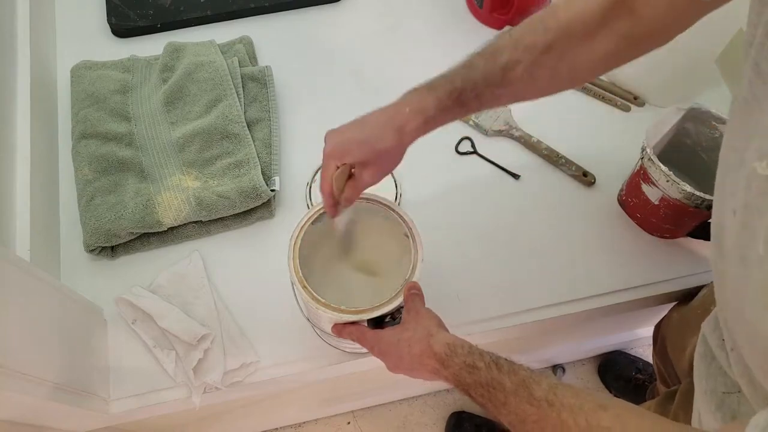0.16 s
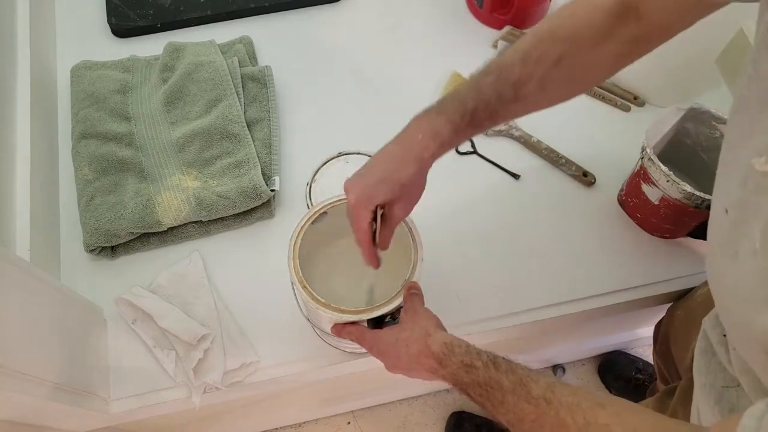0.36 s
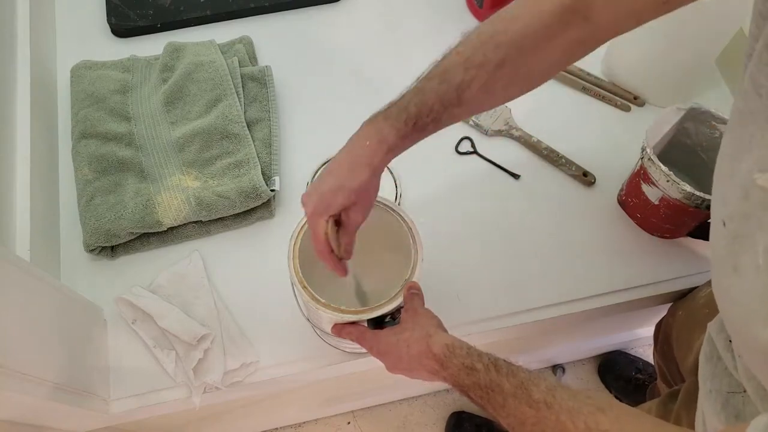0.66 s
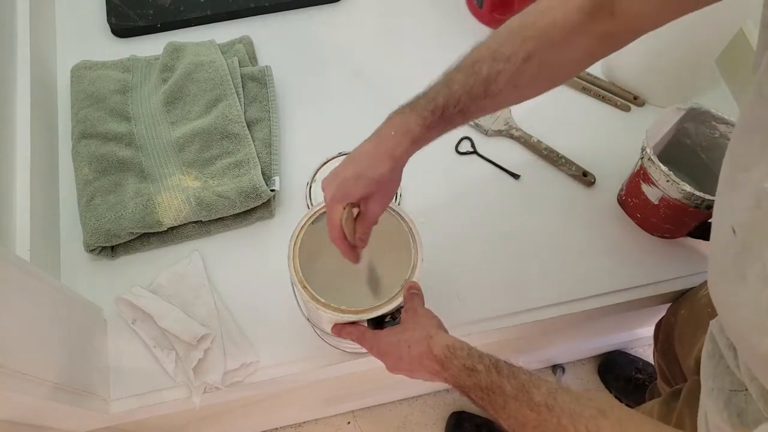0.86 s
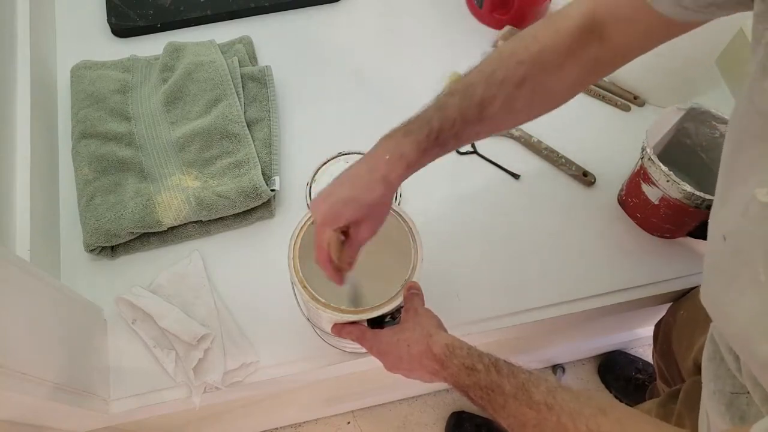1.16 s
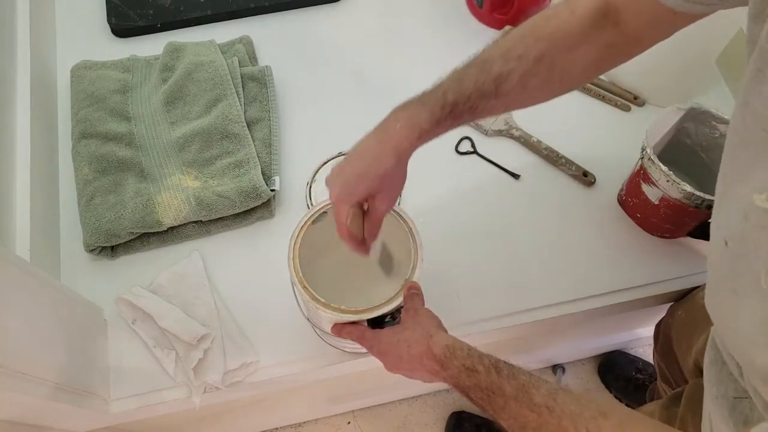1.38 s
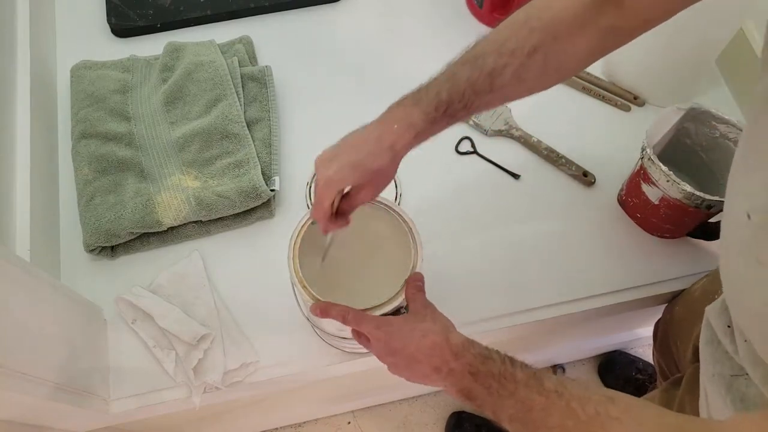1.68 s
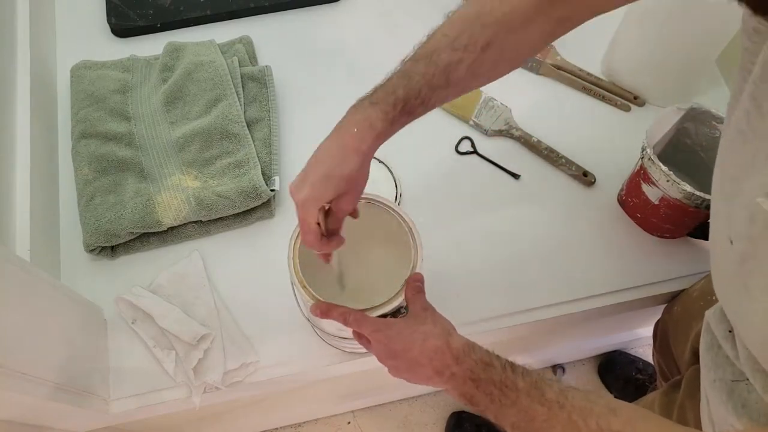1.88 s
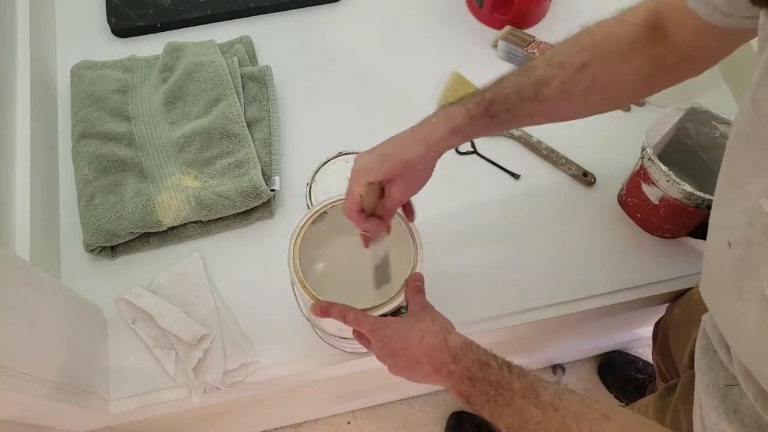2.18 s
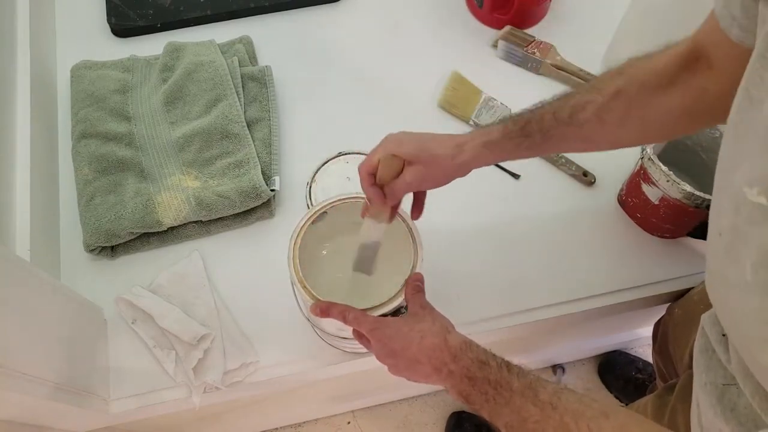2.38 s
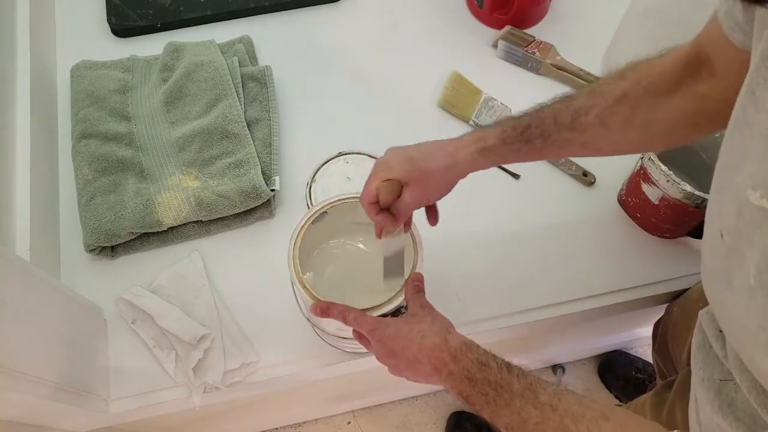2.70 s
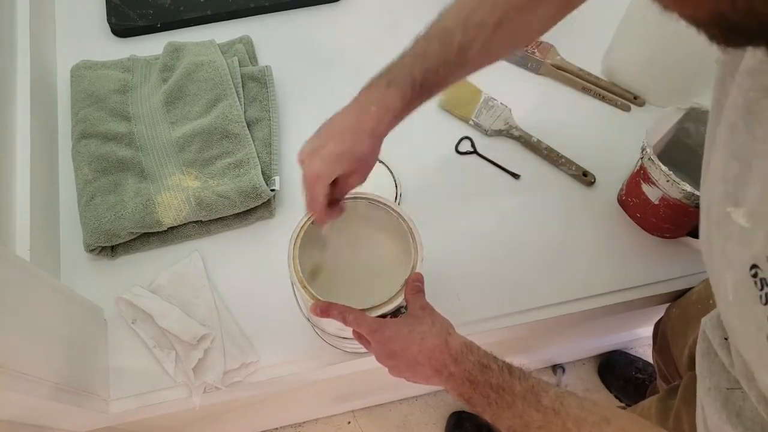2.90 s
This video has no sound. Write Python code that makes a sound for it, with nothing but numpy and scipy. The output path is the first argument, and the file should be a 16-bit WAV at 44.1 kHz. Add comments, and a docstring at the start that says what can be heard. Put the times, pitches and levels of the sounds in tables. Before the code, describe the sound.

Vigorous stirring in a paint-filled can: rough skidding knocks come first, then crisper irregular taps that grow loudest near the end, with short wall rubs and bright rim ticks; close microphone, small dry room, low hum.

```python
"""A dense rattle is heard first: a wooden stick stirs fast in a full metal paint can, knocking and skipping.
Each contact is a short rough push that excites the modes of the paint-damped can: a low body ring,
upper modes and a bright crack of filtered noise, answered by the diffuse tail of a small hard room.
In places the stick rubs along the wall: random slips through the same modes, with hiss.
Steady shaped noise lies under it all as a low room hum."""
import sys
import numpy as np
from scipy import signal
from scipy.fft import rfft, irfft, next_fast_len
from scipy.io import wavfile
from scipy.ndimage import uniform_filter1d

SR = 44100
rng = np.random.default_rng(int(sys.argv[2]) if len(sys.argv) > 2 else 0)


def master_out(mix):
    """Clip the mix to full scale and print it as 16-bit PCM to the path in sys.argv[1]."""
    frames = np.transpose(np.atleast_2d(mix))
    ceiling = np.clip(frames, -1, 1)
    pcm = np.round(ceiling * 32767).astype(np.int16)
    wavfile.write(sys.argv[1], SR, pcm)


def to_linear_factor(level_db):
    """Convert decibel levels (scalar or array-like) to linear amplitude factors."""
    exponent = np.asarray(level_db, float) / 20
    return 10 ** exponent


N = 134505
LENGTH, LEAD = 8192, 1024  # samples computed per contact, and those of them ahead of the contact
T = (np.arange(LENGTH) - LEAD) / SR  # s from the contact
AFTER = np.maximum(T, 0)
HZ = np.fft.rfftfreq(LENGTH, 1 / SR)

TAP_RISE_MS, SKID_PEAK_S, SKID_HZ = 0.05, 0.002, 2150
TICK_RING_DB, TICK_HZ = -1, 3430  # upper modes over the crack, best-driven mode
# sharp taps: t/s, contact level/dB, low ring over it level/dB, crack over it level/dB,
# best-driven upper modes f/Hz
TAP_CONTACTS = [(0.0024, -10, -8, -13, 2500), (0.013, -11.5, -19, -6.5, 2340),
                (0.051, -14.5, -38, -4, 2520), (0.118, -16.5, -36, 2, 2490), (0.353, -21.5, -3, -2, 3480),
                (0.4, -21.5, -40, 1, 3360), (0.4205, -13.5, -7.5, -24, 2520), (0.5072, -8, -8.5, -18, 2380),
                (0.5505, -9, -14.5, -18, 2360), (0.6938, -17, -12, -6.5, 1540), (0.7263, -19, -9, -5, 1650),
                (0.7905, -7, -14.5, -11, 1580), (0.8151, -11, -21, -27, 3480),
                (0.829, -7.5, -15, -21, 3930), (0.8566, -3, -18.5, -16, 2220),
                (0.8881, -14.5, -12, -19, 2350), (0.9143, -9, -12, -37, 1600), (0.9427, -24, -3, -28, 1610),
                (0.966, -8.5, -11, -19, 1700), (0.991, -12, -13, -10.5, 1670),
                (1.0103, -11, -14.5, -10.5, 2540), (1.042, -12, -16.5, -10.5, 1590),
                (1.0639, -17.5, -17.5, -20, 1560), (1.137, -14.5, -14, -10, 1770),
                (1.1631, -16, -11.5, -8.5, 1610), (1.1941, -13.5, -21, -17, 3200),
                (1.2102, -9.5, -15, -14, 1590), (1.2348, -18, -13, -21, 3440),
                (1.2741, -12, -8.5, -8, 1610), (1.304, -11.5, -18, -13, 3430), (1.3252, -13, -31, -9, 1570),
                (1.3532, -11.5, -14, -12.5, 1620), (1.3787, -10.5, -12.5, -11.5, 3100),
                (1.4169, -14.5, -11.5, -13, 2530), (1.4427, -13, -10.5, -5, 3420),
                (1.5113, -8.5, -15.5, -10.5, 1630), (1.5351, -13.5, -23, -7.5, 3420),
                (1.548, -15, -22, -16, 1610), (1.5849, -12.5, -40, -4.5, 3900),
                (1.607, -9.5, -17, -15, 1660), (1.626, -20, -45, -7.5, 2770),
                (1.6496, -8, -18.5, -6.5, 1550), (1.6728, -10, -13, -7.5, 1680),
                (1.69, -9.5, -43, -19, 3400), (1.7131, -16, -35, -6, 1920),
                (1.737, -15.5, -12, -11.5, 1520), (1.7598, -15, -29, -2.5, 2360),
                (1.865, -19.5, -17, -16, 3380), (1.8793, -14.5, -24, -18, 2590),
                (1.9144, -21, -39, -14, 2410), (1.929, -4.5, -16, -15, 2480),
                (2.0056, -20, -7.5, -35, 1620), (2.0209, -18, -38, -9, 2390),
                (2.0646, -12.5, -12.5, -8, 3600), (2.0805, -12, -32, -10.5, 2360),
                (2.1104, -18.5, -32, -10.5, 1700), (2.1438, -23, -32, -3, 1410),
                (2.1956, -16, -9.5, -35, 1340), (2.2084, -9, -49, -3.5, 3130),
                (2.225, -4.5, -11.5, -24, 1630), (2.2414, -6.5, -53, -7.5, 2470),
                (2.2673, -4, -18, -15, 1730), (2.2912, -8.5, -54, -6, 2700),
                (2.3125, -4.5, -12.5, -23, 1730), (2.3303, -4.5, -36, -6.5, 3900),
                (2.369, -8, -50, -5.5, 1770), (2.393, -7.5, -13, -16, 2560), (2.4089, -9, -39, -5, 3170),
                (2.4266, -1, -15, -18, 1700), (2.4667, -10, -44, -9, 2540), (2.487, -5, -16.5, -16, 1540),
                (2.5134, -12.5, -13.5, -18, 2480), (2.5404, -3, -15, -22, 2480),
                (2.594, -6, -10.5, -15.5, 1600), (2.6211, -5, -9.5, -20, 1620),
                (2.6472, -1.5, -19.5, -16.5, 1510), (2.679, -10.5, -39, -7, 2480),
                (2.728, -1, -14.5, -12.5, 1310), (2.7567, 2.5, -17, -16.5, 1860),
                (2.7995, -6.5, -17, -15.5, 3430), (2.8312, -16.5, -8.5, -2.5, 3460),
                (2.9616, -10.5, -16, -9.5, 1440), (2.9905, -20, -5.5, -4, 2340)]
# skids that swell to a peak SKID_PEAK_S after t: t/s, contact level/dB, low ring over it level/dB,
# crack over it level/dB, swell time constant t/ms
SKID_CONTACTS = [(0.035, -5.5, -12, -18, 4.8), (0.0677, -4, -10.5, -22, 4.9), (0.1021, -4, -14, -16, 4.4),
                 (0.1354, 0, -18.5, -24, 4), (0.1736, 1, -18, -26, 2.2), (0.2032, -2, -17, -20, 4.2),
                 (0.2373, -6, -13.5, -31, 4.8), (0.273, 0.5, -11.5, -19, 4.7), (0.3093, 2, -13, -13.5, 6),
                 (0.341, -2.5, -19, -19, 6.8), (0.464, -6, -12.5, -12.5, 2.5),
                 (0.595, -6.5, -10, -13.5, 2.5), (0.6456, 0, -16.5, -16.5, 5.3),
                 (1.0909, -7.5, -11.5, -14, 1.9), (1.258, -10.5, -9.5, -18, 4.9),
                 (1.426, -11.5, -20, -12, 3.1), (1.4644, -5.5, -19.5, -11.5, 1.6),
                 (1.5604, -9.5, -16, -14.5, 3), (1.8931, -12, -12, -18, 0.95), (2.86, -4.5, -14, -21, 6),
                 (2.8737, -6, -28, -22, 3), (2.9198, -8.5, -13, -12.5, 2.8), (3.022, -27, 0, -22, 2.1),
                 (3.043, -11, 2, -9, 4.3)]
# bright little ticks as the stick's edge bounces back on the rim: t/s, crack level/dB
RIM_TICKS = [(0.082, -18.5), (0.15, -24), (0.1714, -19.5), (0.2243, -24), (0.2506, -19.5), (0.3033, -22),
             (0.4355, -17), (0.4794, -24), (0.521, -17), (0.5638, -21), (0.5901, -21), (0.613, -23.5),
             (0.6657, -23), (0.9062, -32), (0.9575, -22.5), (1.0835, -22), (1.1115, -24.5), (1.2058, -21),
             (1.2527, -19.5), (1.3966, -23), (1.4877, -20), (2.5476, -18), (2.6268, -18)]


def contacts():
    """Intermittent contact: taps, skids and ticks, one row each, differ in force, rise and modes driven."""
    rows = [(*tap, TAP_RISE_MS) for tap in TAP_CONTACTS]
    for s, level_db, low_db, crack_db, swell_ms in SKID_CONTACTS:
        rows.append((s + SKID_PEAK_S, level_db, low_db, crack_db, SKID_HZ, swell_ms))
    for s, db in RIM_TICKS:
        rows.append((s, db + TICK_RING_DB, -np.inf, -TICK_RING_DB, TICK_HZ, TAP_RISE_MS))
    return [column[:, None] for column in np.transpose(rows)]


PUSH_S = 0.0055  # decay time constant


def push_envelope(rise):
    """Contact force: it grows exponentially to the contact and dies fast after it."""
    return rise * np.exp(-AFTER / PUSH_S)


PITCH_SCATTER, MODE_SCATTER_DB = 0.006, 2.2  # each contact bends the can a little differently


def mode_scatter(contact_count, mode_count):
    """Modal perturbation: every contact shifts the strength (dB) and pitch (share) of each mode."""
    shape = (contact_count, mode_count)
    return MODE_SCATTER_DB * rng.standard_normal(shape), PITCH_SCATTER * rng.standard_normal(shape)


LOW_BLOW_DB = 7  # clean blow over the rough push
LOW_DELAY_S = 0.0011  # the can's body answers just after the wall
LOW_LAG_S = 0.00034  # the low ring swells late
LOW_FOCUS_DB = 12  # loss per octave away from the best-driven low mode
# low modes of the can's body: f/Hz, width f/Hz, level/dB
LOW_MODES = [(263, 32.4, -6), (451.5, 16.2, -9.5), (540, 37, 2), (592, 116, -1), (738, 130, -4),
             (874, 48, 2.5)]
# best-driven low mode, which moves as the grip on the can shifts: t/s, f/Hz
LOW_MODE_FOCUS = [(0, 607), (.7, 720), (.9, 540)]


def low_ring(s, rough, blow):
    """Modal response: the low body modes ring late, strongest near the best-driven one."""
    push = rfft(rough + to_linear_factor(LOW_BLOW_DB) * blow)
    focus_hz = np.interp(s, *np.transpose(LOW_MODE_FOCUS))
    focus_db = -LOW_FOCUS_DB * np.abs(np.log2(np.array(LOW_MODES)[:, 0] / focus_hz))
    scatter_db, bend = mode_scatter(len(s), len(LOW_MODES))
    modes = resonances(LOW_MODES, HZ, scatter_db + focus_db, bend)
    delay = np.exp(-2j * np.pi * HZ * LOW_DELAY_S)
    # half-order lag centred on the third mode
    lag = 1 / np.sqrt(1 + 2j * np.pi * (HZ - LOW_MODES[2][0]) * LOW_LAG_S)
    return irfft(push * delay * modes * lag, LENGTH)


BLOW_DB = 2  # clean blow over the rough push
FOCUS_DB, BELOW_FOCUS_DB = 7, 7  # loss per octave over and under the best-driven upper modes
BROAD_HZ, BROAD_WIDTH_HZ, BROAD_DB = 2430, 1950, -15.5  # the many small modes between the named ones
# upper modes of the can: f/Hz, width f/Hz, level/dB
UPPER_MODES = [(1312, 82, -5), (1614, 66, 0), (1892, 51, -8), (2020, 30, -7), (2360, 120, -3),
               (2480, 139, -2.5), (2770, 60, -6.5), (3130, 89, -7.5), (3430, 78, -5), (3895, 84, -5.5),
               (4625, 59, -6.5), (5170, 69, -9.5)]


def upper_ring(focus_hz, rough, blow, envelope):
    """Modal superposition: distinct upper modes ring over one broad band of many small modes."""
    push = rfft(rough + to_linear_factor(BLOW_DB) * blow)
    octaves = np.log2(np.array(UPPER_MODES)[:, 0] / focus_hz)
    focus_db = np.minimum(-FOCUS_DB * octaves, BELOW_FOCUS_DB * octaves)
    scatter_db, bend = mode_scatter(len(focus_hz), len(UPPER_MODES))
    named = resonances(UPPER_MODES, HZ, scatter_db + focus_db, bend)
    broad = resonances([(BROAD_HZ, BROAD_WIDTH_HZ, BROAD_DB)], HZ, np.zeros_like(focus_hz))
    broad_push = rfft(rng.standard_normal(envelope.shape) * envelope)
    return irfft(push * named + broad_push * broad, LENGTH)


# spectral density of the crack, upper part: f/Hz, level per Hz/dB
CRACK_HIGH_DENSITY = [(4500, -1), (5710, -5.5), (7400, -2.5), (8120, -5), (10900, -2.5), (12500, -6)]
# spectral density of the crack, lower part: f/Hz, level per Hz/dB
CRACK_LOW_DENSITY = [(30, -15), (200, -12.5), (1000, -11), (3000, 0.5)]


def crack_colour(hz):
    """Spectral density: gain of the broad crack of wood on metal."""
    return to_linear_factor(along(CRACK_LOW_DENSITY + CRACK_HIGH_DENSITY, hz))


CRACK_T60_S, CLICK_S, CLICK_DB = 0.11, 0.0019, 2.5  # slow decay; time constant and level of the sharp front
SNAP_DB = 17.5  # single spike of a tap or tick
TILT_SCATTER_DB, TICK_TILT_DB = 1, 1.5  # dB per octave: random tilt of each contact, brightening of a tick


def crack(rise, is_sharp, is_tick):
    """Broadband impact noise: two-stage decay, with a one-sample spike where the contact is sharp."""
    tilt_db = TILT_SCATTER_DB * rng.standard_normal(is_tick.shape) + TICK_TILT_DB * is_tick
    colour = crack_colour(HZ) * to_linear_factor(tilt_db * np.log2(1 + HZ / BROAD_HZ))
    noise = irfft(rfft(rng.standard_normal(rise.shape)) * colour, LENGTH)
    fade = to_linear_factor(-60 * AFTER / CRACK_T60_S) + to_linear_factor(CLICK_DB) * np.exp(-AFTER / CLICK_S)
    spike = to_linear_factor(SNAP_DB) * is_sharp * rng.standard_normal(is_sharp.shape) * (T == 0)
    return noise * rise * fade + irfft(rfft(spike) * colour, LENGTH)


ROOM_T60_S, ROOM_DB, ROOM_GAP_S = 0.079, -13.5, 0.0036  # decay, tail level, silence ahead of the tail


def room_answer(direct):
    """Diffuse reverberation: each contact meets a fresh decaying noise tail after a short gap."""
    late = np.arange(LENGTH) / SR
    tail = rng.standard_normal(direct.shape) * to_linear_factor(-60 * late / ROOM_T60_S) * (late > ROOM_GAP_S)
    tail = to_linear_factor(ROOM_DB) * tail / np.linalg.norm(tail, axis=1, keepdims=True)
    return irfft(rfft(direct) * rfft(tail), LENGTH)


LOW_DB, UPPER_DB, CRACK_DB = -3.5, -13.5, -3.5  # peak of each part over its level in the contact row


def knocks():
    """Impact excitation: rough push and clean blow ring the can and crack; the room answers each anew."""
    s, level_db, low_db, crack_db, focus_hz, rise_ms = contacts()
    rise = np.exp(np.minimum(T, 0) * 1000 / rise_ms)
    envelope = push_envelope(rise)
    rough = rng.standard_normal(envelope.shape) * envelope
    blow = np.linalg.norm(rough, axis=1, keepdims=True) * (T == 0)  # impulse with the energy of the push
    low = to_linear_factor(low_db + LOW_DB) * peak_one(low_ring(s, rough, blow))
    upper = to_linear_factor(UPPER_DB) * peak_one(upper_ring(focus_hz, rough, blow, envelope))
    bright = crack(rise, rise_ms == TAP_RISE_MS, np.isinf(low_db))
    bright = to_linear_factor(crack_db + CRACK_DB) * peak_one(bright)
    direct = to_linear_factor(level_db) * (low + upper + bright)
    wet = direct + room_answer(direct)
    at = np.round(s * SR).astype(int) + np.arange(LENGTH)
    return np.bincount(at.ravel(), wet.ravel(), N + LENGTH)[LEAD:LEAD + N]


SCRAPE_RATE, SCRAPE_SIZE_DB, SCRAPE_HISS_DB = 1300, 4, -4  # mean slips/s, size scatter, hiss over rub level
RUB_ATTACK_S, RUB_RELEASE_S = 0.00043, 0.015  # linear attack, release time constant
# held rubs along the wall: start t/s, length t/s, level/dB
WALL_RUBS = [(0, 0.1, -32), (0.128, 0.11, -32), (0.227, 0.15, -35.5), (0.692, 0.051, -37.5),
             (0.789, 0.028, -27), (0.855, 0.034, -30.5), (0.92, 0.028, -29.5), (1.055, 0.039, -39),
             (1.204, 0.022, -30.5), (1.267, 0.056, -32.5), (1.33, 0.049, -51), (1.419, 0.06, -37.5),
             (1.514, 0.079, -33.5), (1.691, 0.079, -42), (1.792, 0.055, -54), (1.861, 0.04, -39.5),
             (2.795, 0.041, -32.5), (2.858, 0.032, -26), (2.911, 0.041, -32.5), (2.953, 0.12, -33.5)]


def scrape():
    """Stick-slip friction: tiny uneven slips along the wall excite the can's modes, with hiss."""
    t = np.arange(N) / SR
    level = np.zeros(N)
    for s, length, db in WALL_RUBS:
        attack = np.clip((t - s) / RUB_ATTACK_S, 0, 1)
        level += to_linear_factor(db) * attack * np.exp(-np.maximum(t - s - length, 0) / RUB_RELEASE_S)
    sizes = to_linear_factor(SCRAPE_SIZE_DB * rng.standard_normal(N)) * rng.standard_normal(N)
    slips = unit((rng.random(N) < SCRAPE_RATE / SR) * sizes)
    m = next_fast_len(N + LENGTH)
    hz = np.fft.rfftfreq(m, 1 / SR)
    driven = LOW_MODES[2:] + UPPER_MODES  # the two lowest modes stay silent
    modes = resonances(driven, hz, np.zeros((1, len(driven))))[0]
    modes = modes / np.sqrt(np.mean(np.abs(modes) ** 2))
    ring = irfft(rfft(level * slips, m) * modes, m)[:N]
    hiss = irfft(rfft(rng.standard_normal(N) + slips, m) * crack_colour(hz), m)[:N]
    return ring + level * to_linear_factor(SCRAPE_HISS_DB) * unit(hiss)


HUM_DB = -53.5  # rms
# spectral density of the room hum, before scaling to HUM_DB: f/Hz, level per Hz/dB
HUM_DENSITY = [(30, -31), (259, 13.5), (740, 20.5), (1130, 8), (3310, -2), (10800, 6), (16000, -10)]


def hum():
    """Stationary noise: a fixed spectral density gives the steady room hum."""
    m = next_fast_len(N)
    colour = to_linear_factor(along(HUM_DENSITY, np.fft.rfftfreq(m, 1 / SR)))
    return to_linear_factor(HUM_DB) * unit(irfft(rfft(rng.standard_normal(m)) * colour, m)[:N])


def along(points, hz):
    """Logarithmic frequency scale: (f/Hz, level/dB) points are interpolated on it."""
    f, db = np.transpose(points)
    return np.interp(np.log(hz + 1), np.log(f + 1), db)


def unit(x):
    """Mean power: scale to rms 1."""
    return x / np.sqrt(np.mean(x ** 2) + 1e-20)


def peak_one(rows):
    """Short-time power: scale each row so that its rms over 128 samples peaks at 1."""
    top = uniform_filter1d(rows ** 2, size=128, axis=1).max(axis=1, keepdims=True)
    return rows / np.sqrt(top + 1e-20)


def resonances(modes, hz, scatter_db, bend=0):
    """Damped oscillators: summed causal responses; scatter_db and bend have one column per mode."""
    centre, width, db = np.transpose(modes)
    centre = centre * (1 + bend + 0 * scatter_db)
    total = 0
    for k in range(len(modes)):
        damping = 1j * hz * width[k]
        response = damping / (centre[:, k:k + 1] ** 2 - hz * hz + damping)
        total = total + (-1) ** k * to_linear_factor(db[k] + scatter_db[:, k:k + 1]) * response  # signs alternate
    return total


def scene():
    """Linear superposition: all sources sum in one channel."""
    return (knocks() + scrape() + hum())[None]


def low_pass(x):
    """Removes everything above the highest recorded frequency."""
    return signal.sosfilt(signal.butter(12, 16990, fs=SR, output="sos"), x)


def record(dry):
    """Band limitation: flat below 15.75 kHz, 31 dB down from there to 17 kHz, nothing above."""
    m = next_fast_len(N + LENGTH)
    hz = np.fft.rfftfreq(m, 1 / SR)
    gain = np.where(hz < 15750, 1, to_linear_factor(-31) * (hz < 17000))
    mix = irfft(rfft(dry, m) * gain, m)[:, :N]
    return low_pass(mix)


dry = scene()
out = record(dry)
master_out(out)
```